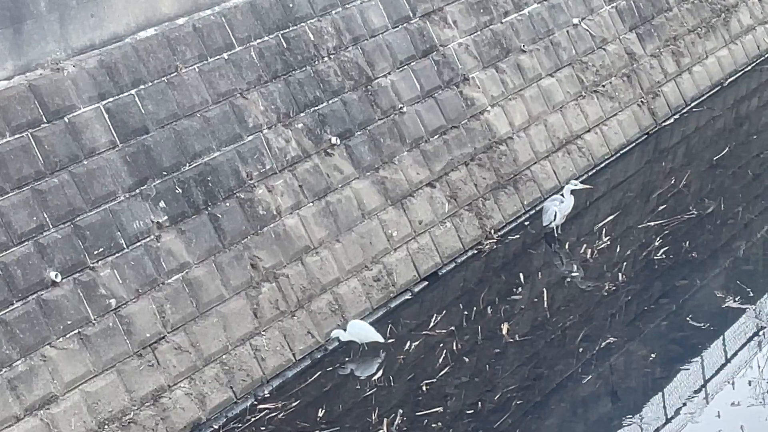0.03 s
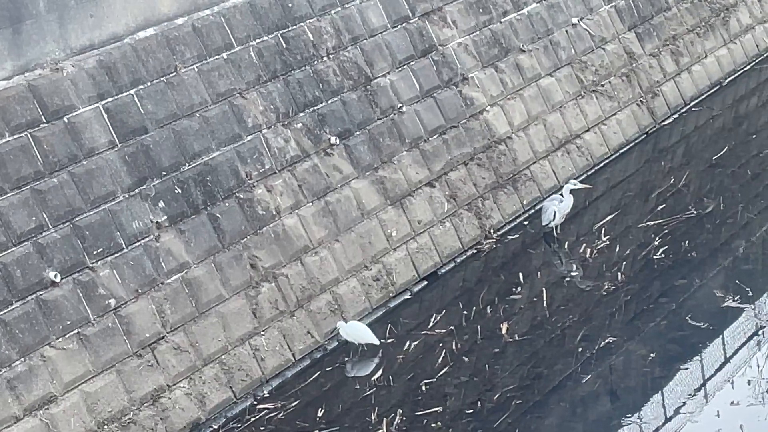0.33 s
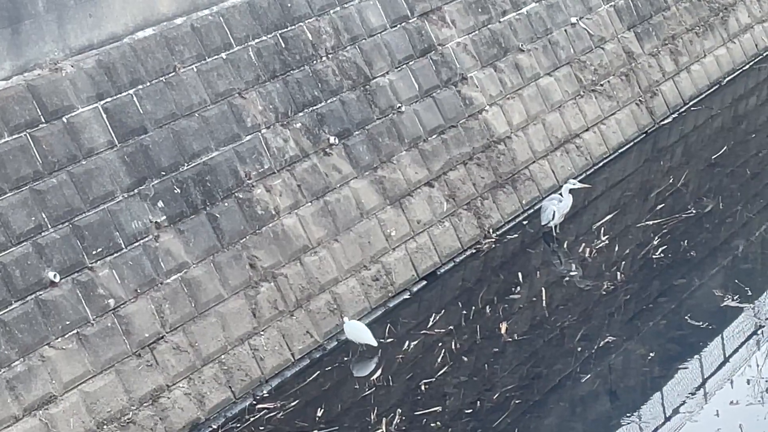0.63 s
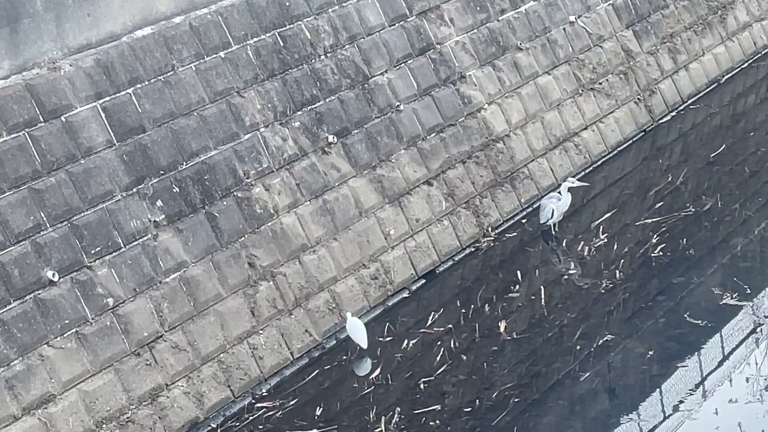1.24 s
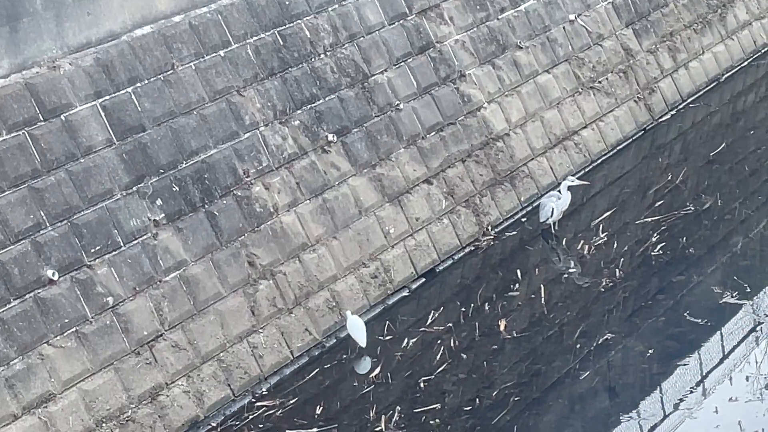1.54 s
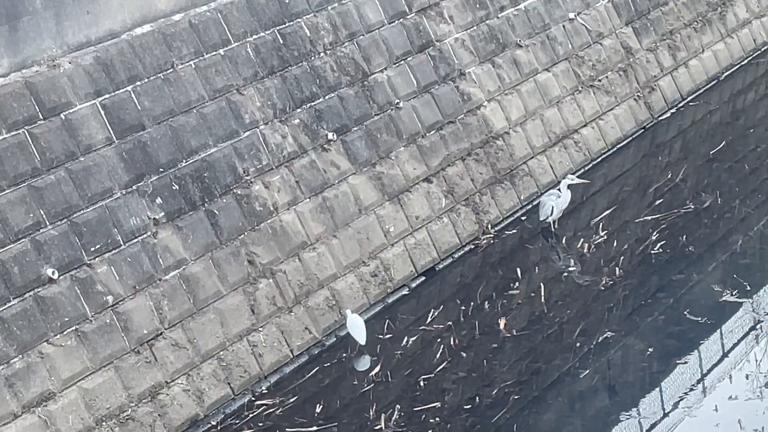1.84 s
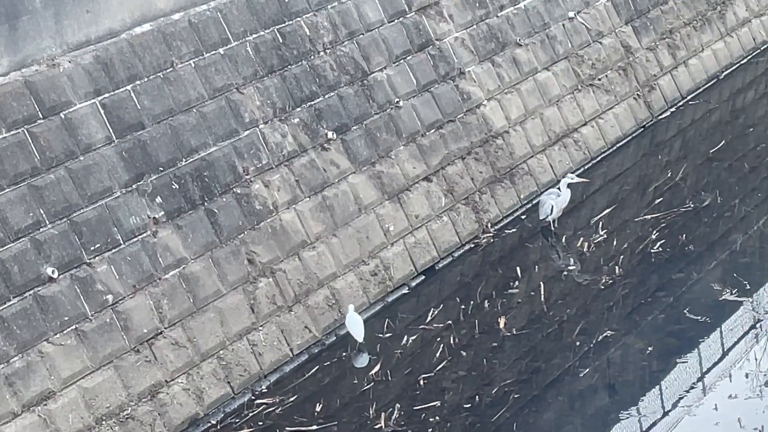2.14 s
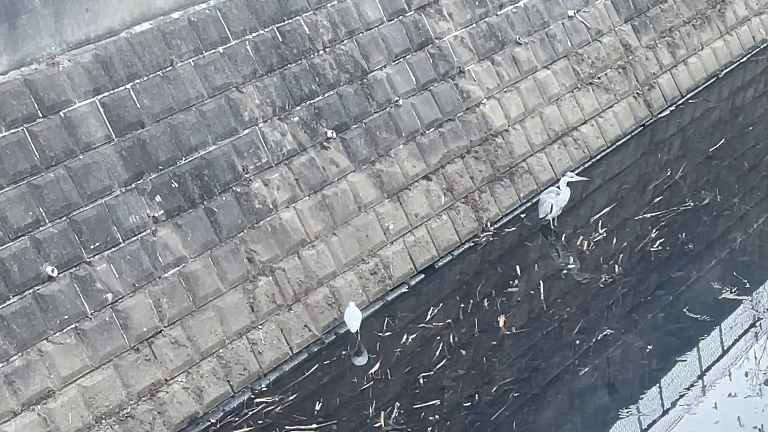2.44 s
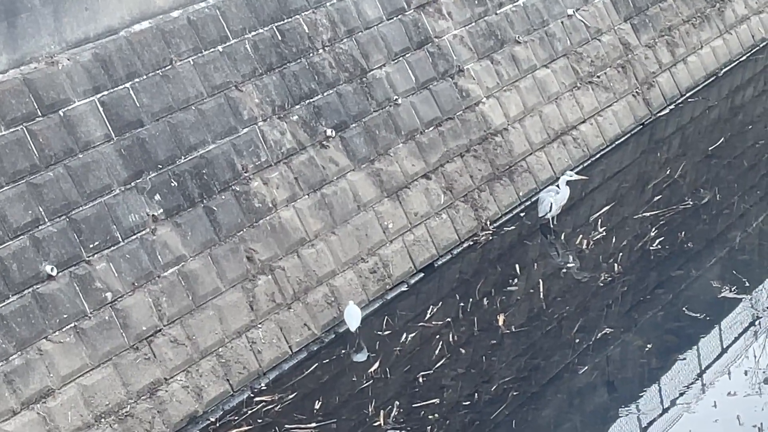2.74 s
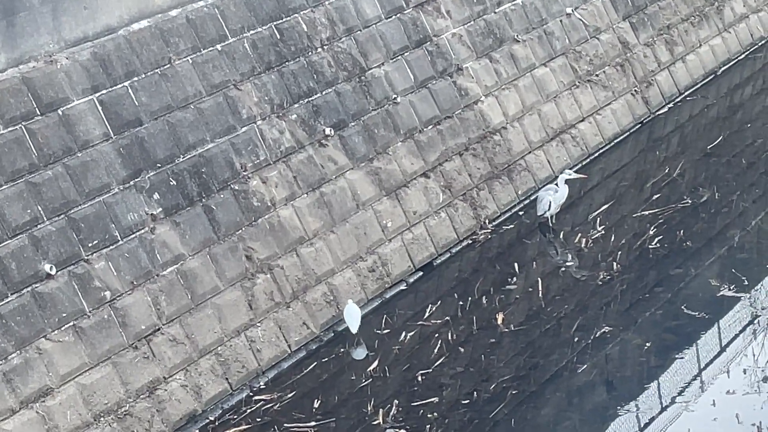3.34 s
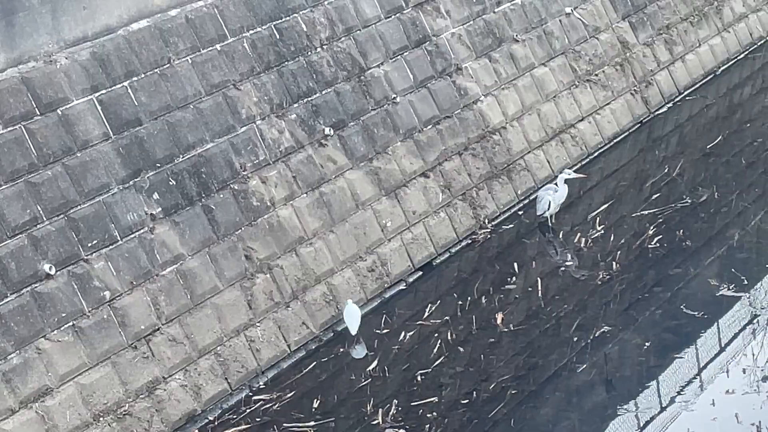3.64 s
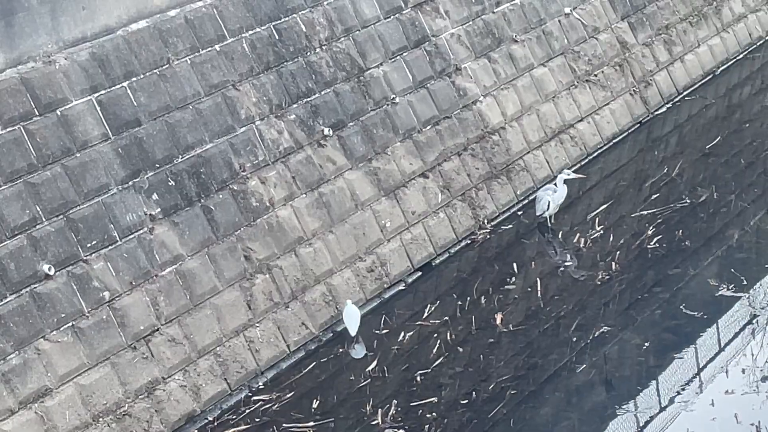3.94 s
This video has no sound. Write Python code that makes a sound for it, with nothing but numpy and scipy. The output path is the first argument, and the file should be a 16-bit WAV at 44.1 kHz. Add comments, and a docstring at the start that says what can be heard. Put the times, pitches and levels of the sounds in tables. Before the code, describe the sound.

Distant traffic rumbles steadily over a faint trickle, then a breeze buffets the microphone.

```python
"""A quiet town canal between stone banks. From the start, distant traffic lays down a dull roar,
an engine drones far off and shallow water trickles faintly; one puff of air touches the microphone.
From about 1 s, soft rustles and small ticks dot the bed. Near 1.9 s a small bird calls once, with a
short tail off the banks, and at 2.5 s something dry brushes close by.
From 2.9 s to the end a breeze buffets the microphone, each eddy a low push."""
import sys
import numpy as np
from scipy import signal
from scipy.fft import rfft, irfft
from scipy.io import wavfile
from scipy.ndimage import uniform_filter1d

SR = 44100
rng = np.random.default_rng(int(sys.argv[2]) if len(sys.argv) > 2 else 0)


def transcribe(signal):
    """Save signal, clipped to [-1, 1], as a 16-bit WAV file at the path in sys.argv[1]."""
    frames = np.atleast_2d(signal).T
    limited = np.clip(frames, -1, 1)
    pcm = np.round(limited * 32767).astype(np.int16)
    wavfile.write(sys.argv[1], SR, pcm)


N = 176400
T = np.arange(N) / SR
HZ = np.fft.rfftfreq(N, 1 / SR)


def traffic():
    """Distant traffic: a wide, dull roar whose bass swells on its own."""
    colour = [(10, -45), (24, -28), (36, -7), (56, 2), (80, -1), (105, -2), (140, -8), (200, -10),
              (255, -11), (330, -13), (480, -19.5), (730, -17), (980, -18), (1200, -22.5), (1520, -22.5),
              (1680, -26.5), (1900, -25.5), (2300, -32.5), (2750, -45), (3500, -60.5), (5000, -79),
              (16000, -108)]  # spectrum of the roar: f/Hz, relative level/dB
    likeness = [(35, 0.59), (75, 0.95), (140, 0.98), (255, 0.65), (380, .62), (620, 0.38), (950, 0.79),
                (1500, .55), (1700, 0.19), (2400, 0.52), (3000, 0.42), (4000, 1)]  # stereo image: f/Hz, left-right likeness
    balance = [(60, -1), (200, -2), (400, -2.5), (600, -0.5), (950, -0.5), (1200, -3.5), (1500, -8.5),
               (1680, 4), (1850, 10.5), (2100, -1), (2350, 0), (3000, -1)]  # left minus right: f/Hz, level/dB
    left_lead = [(340, -0.095), (550, 0.8), (800, 1.56), (1150, 1.5), (1420, 1.37), (1570, 0.083),
                 (1720, 1.4), (1880, .3), (2300, 0.14), (3500, 0.16)]  # the roar arrives from the left: f/Hz, phase lead/rad
    bass_ride = [(0, -3.5), (.6, -3), (1.2, 2), (2.2, -0.5), (2.5, -5), (2.9, -1.5), (4, -1.7)]  # fader below the crossover: t/s, gain/dB
    body_ride = [(0, 0), (1.2, 0.47), (2, 0.43), (2.7, 0), (3.4, -0.1), (4, 1)]  # fader above the crossover: t/s, gain/dB
    roar_db, crossover_hz = -42, 112
    roar = noise(over_hz(colour), over_hz(likeness), over_hz(balance), over_hz(left_lead))
    bass = irfft(rfft(roar) / (1 + (HZ / crossover_hz) ** 4), N)
    body = (roar - bass) * amp(over_time(body_ride) + 0.35 * drift(6.4))
    return amp(roar_db) * (bass * amp(over_time(bass_ride)) + body)


def engines():
    """Far engine drone: wavering low tones that come and go in the traffic."""
    drones = [(0.0, 1.5, 58, 3.5, -50.5), (0.0, 1.5, 252, 2, -61.5), (0.0, 0.22, 129, 2, -52),
              (0.5, 0.32, 105, 1.5, -49.5), (0.9, 0.4, 157, 2, -54), (1.38, 0.75, 108, 2.5, -50.5),
              (1.85, 1.0, 56, 0.9, -48.5), (2.4, 0.24, 201, 3, -54.5)]  # engine tones: start/s, length/s, f/Hz, wander/Hz, level/dB
    fade_s = 0.084
    out = np.zeros(N)
    for start, length, hz, wander, db in drones:
        fade = np.clip(np.minimum(T - start, start + length - T) / fade_s, 0, 1)
        cycles = np.cumsum(hz + wander * drift(5.6)) / SR
        out += amp(db) * fade * unit(np.sin(2 * np.pi * cycles))
    return out


def breeze():
    """Each eddy gives the microphone a short low push; the hardest ones thump higher up."""
    gusts = [(0.302, 0.023, -39), (2.935, 0.038, -44), (3.055, 0.039, -37.5), (3.191, 0.02, -36.5),
             (3.331, 0.037, -38.5), (3.404, 0.018, -28.5), (3.495, 0.022, -33.5), (3.573, 0.018, -39.5),
             (3.638, 0.009, -32), (3.758, 0.04, -40), (3.868, 0.0085, -35)]  # eddies: t/s, half length/s, level before the low cut/dB
    colour = [(10, -50.5), (25, -21), (42, 1), (75, 6), (110, -10.5), (200, -17), (400, -44.5),
              (1000, -58.5), (4000, -100)]  # spectrum of the rumble: f/Hz, relative level/dB
    likeness, low_cut_hz = 0.89, 29
    thump_hz, thump_octaves, thump_db = 174, 0.73, -13
    strength = np.sqrt(sum((amp(db) * swell(s, half)) ** 2 for s, half, db in gusts))
    rumble = steadied(noise(over_hz(colour), likeness), size=1500)
    thump = noise(2 * bell_db(thump_hz, thump_octaves), likeness)
    push = strength * (rumble + amp(thump_db) * strength / strength.max() * thump)
    low_cut = 1 - 1 / (1 + (HZ / low_cut_hz) ** 4)
    return irfft(rfft(push) * low_cut, N)


def bird():
    """One thin call that dips in pitch, with a rasp around each harmonic and no fundamental."""
    contour = [(1.89, 1560, -100, -100, -92.5), (1.908, 1635, -95, -88, -85), (1.922, 1615, -75, -86, -86),
               (1.93, 1588, -66.5, -77, -77), (1.95, 1480, -68, -74.5, -79.5),
               (1.966, 1543, -67, -71.5, -87), (1.975, 1465, -68, -92, -90), (1.989, 1490, -77, -90, -96),
               (2.005, 1560, -86, -100, -100)]  # the call: t/s, pitch/Hz, level/dB of harmonics 2, 3 and 4
    pitch_jitter, flutter_db = 0.011, 0.5
    rasp_db, rasp_hz = -11, 420
    times, pitch, *levels = np.transpose(contour)
    cycles = np.cumsum(np.interp(T, times, pitch) * (1 + pitch_jitter * drift(190))) / SR
    call = np.zeros(N)
    for harmonic, db in enumerate(levels, start=2):
        rasp = amp(rasp_db) * (drift(rasp_hz) + 1j * drift(rasp_hz))
        tone = (1 + rasp) * np.exp(2j * np.pi * harmonic * cycles)
        call += amp(np.interp(T, times, db)) * unit(tone.real)
    gate = (T > times[0]) * (T < times[-1])
    call = call * amp(flutter_db * drift(400)) * gate
    return banks(np.array([call, call]), wet_db=-7.5)


def brushes():
    """A dry snap and scrape close by, in three touches: bright at first, then duller."""
    touches = [(2.534, 0.004, 0.008, -64.5, 5), (2.541, .004, 0.018, -66.5, -2.5),
               (2.585, 0.004, .013, -76, 3)]  # contacts: t/s, rise/s, decay/s, level/dB, tilt/(dB per octave)
    colour = [(1500, -24), (3200, -5), (4200, -3), (5200, 6), (6300, -4), (7400, -5), (8200, 1),
              (9100, -10), (9900, 3), (11000, -11), (13000, -13), (15600, -22)]  # spectrum of the scrape: f/Hz, relative level/dB
    likeness = [(7000, 1), (8200, -1.6), (9500, 0.51), (13000, 0.73), (15000, 0)]  # stereo image: f/Hz, left-right likeness
    grain_db = 1.5
    octaves = np.log2(np.maximum(HZ, colour[0][0]))
    out = np.zeros((2, N))
    for start, rise, decay, db, tilt in touches:
        scrape = steadied(noise(over_hz(colour) + tilt * octaves, over_hz(likeness)), size=130)
        out += amp(db) * burst(start, rise, decay) * scrape * amp(grain_db * drift(400))
    return banks(out, wet_db=-10)


def ticks():
    """Small high ticks and drips, each a burst of noise around its own pitch."""
    hits = [(1.258, 6800, .05, .008, -88), (1.298, 5500, 0.08, 0.01, -83), (1.336, 5370, .06, 0.018, -79),
            (1.44, 4280, 0.022, 0.008, -69.5), (1.562, 4750, .07, .008, -78),
            (2.034, 4600, 0.13, 0.0067, -74), (2.047, 4300, .08, .007, -74), (2.205, 3120, .08, 0.011, -72),
            (2.331, 4350, 0.12, 0.0075, -72.5), (2.875, 6000, .1, 0.0089, -83),
            (3.29, 7000, 0.05, 0.028, -89), (3.475, 6770, 0.085, 0.016, -78),
            (3.475, 11600, .25, 0.0077, -85), (3.518, 6250, 0.076, .02, -86),
            (3.615, 5740, 0.18, 0.0058, -79.5), (3.855, 5400, .2, 0.0092, -85)]  # ticks and drips: t/s, f/Hz, width/octaves, decay/s, level/dB
    rise_s = 0.002
    out = sum(amp(db) * burst(s, rise_s, decay) * band(hz, width) for s, hz, width, decay, db in hits)
    return banks(out, wet_db=-13)


def water():
    """Shallow water: a fine wash with many tiny ringing bubbles; each band gurgles on its own."""
    colour = [(1200, -17), (2500, -2.5), (3000, 3.5), (3600, -1.5), (4300, -2), (5200, -10), (6300, -12),
              (7300, -14.5), (8100, -42), (16000, -48)]  # spectrum of the trickle: f/Hz, relative level/dB
    ride = [(0, -81), (.3, -81.5), (.5, -77.5), (.66, -79.5), (1.05, -79), (1.5, -77.5), (1.68, -80),
            (2.05, -78), (2.45, -79), (2.75, -79), (3.08, -79), (3.35, -79), (3.7, -77), (4, -75)]  # fader of the trickle: t/s, level/dB
    bubbles_per_s, pitches, spread_db, bubbles_db = 900, 20, 4.5, -3
    gurgle_db, gurgle_hz = 1.6, 22
    bubbles = np.zeros(N)
    for hz in np.geomspace(2800, 7000, pitches):
        onsets = rng.random(N) < bubbles_per_s / pitches / SR
        gains = amp(spread_db * np.minimum(rng.exponential(1, N), 4))
        cycles = hz * T[:600]
        ping = cycles * np.exp(-cycles / 5) * np.sin(2 * np.pi * cycles)
        bubbles += signal.oaconvolve(onsets * gains, ping)[:N]
    bubbles = unit(irfft(rfft(bubbles) * amp(over_hz(colour)), N))
    wash_spectrum = rfft(noise(over_hz(colour), 1.0) + amp(bubbles_db) * bubbles)
    centres = np.geomspace(2500, 8000, 10)
    gurgle = np.zeros((2, N))
    for share in np.eye(len(centres)):  # overlapping triangular bands
        wash_band = irfft(wash_spectrum * np.interp(HZ, centres, share), N)
        gurgle += wash_band * amp(gurgle_db * drift(gurgle_hz))
    return amp(over_time(ride)) * unit(gurgle)


def rustles():
    """Soft high noise that swells, flickers and fades."""
    swells = [(0.97, .06, 3700, 0.18, -80), (1.128, 0.074, 3450, 0.18, -78),
              (1.354, 0.035, 5150, 0.14, -88), (1.5, 0.047, 4700, 0.14, -86),
              (2.62, .035, 5400, 0.15, -86.5), (3.078, 0.082, 4300, 0.1, -84)]  # rustles: t/s, half length/s, f/Hz, width/octaves, level/dB
    flicker_db = 2
    out = sum(amp(db) * swell(s, half) * band(hz, width) for s, half, hz, width, db in swells)
    return out * amp(flicker_db * drift(60))


def hiss():
    """A faint, steady hiss under everything."""
    colour = [(2000, 0), (5500, 1.5), (7200, -11.5), (10000, 0), (12000, -2), (13500, -14.5),
              (16000, -21.5)]  # spectrum of the hiss: f/Hz, relative level/dB
    likeness = [(5000, 1), (7000, 0.14), (9000, 0.045), (12000, 0.83)]  # stereo image: f/Hz, left-right likeness
    return amp(-89.5) * noise(over_hz(colour), over_hz(likeness))


def banks(x, wet_db):
    """Adds scattered, slightly dull reflections from the stone banks."""
    t60_s, build_s, dull_hz = 0.35, 0.0052, 9000
    t = T[:SR // 2]
    envelope = amp(-60 * t / t60_s) * np.minimum(t / build_s, 1)
    mid, side = rng.standard_normal((2, len(t))) * envelope
    tail = np.array([mid + .3 * side, mid - .3 * side])
    echoes = signal.fftconvolve(x, tail / np.linalg.norm(tail[0]), axes=1)[:, :N]
    return x + amp(wet_db) * irfft(rfft(echoes) / np.sqrt(1 + (HZ / dull_hz) ** 4), N)


def amp(db):
    """Decibels to gain."""
    return 10 ** (np.asarray(db) / 20)


def unit(x):
    """Scales to rms 1."""
    return x / np.sqrt(np.mean(x ** 2) + 1e-30)


def over_hz(points):
    """Reads a table along log frequency."""
    f, value = np.transpose(points)
    return np.interp(np.log(HZ + 1), np.log(f + 1), value)


def over_time(points):
    """Reads a table along time."""
    return np.interp(T, *np.transpose(points))


def noise(spectrum_db, likeness, pan_db=0, lead=0):
    """Stereo noise of rms 1 with given colour, channel likeness, balance and phase lead of the left."""
    mid, side = rfft(rng.standard_normal((2, N)))
    likeness = np.clip(likeness, -1, 1)  # 1 is mono, -1 is opposite polarity
    mid, side = mid * np.sqrt(1 + likeness), side * np.sqrt(1 - likeness)
    lean = amp(pan_db)
    pair = np.array([(mid + side) * lean * np.exp(1j * lead), mid - side]) / np.sqrt(1 + lean ** 2)
    return unit(irfft(pair * amp(spectrum_db), N))


def bell_db(hz, octaves):
    """A band-pass curve in dB, 6 dB down at the given octaves either side of hz."""
    return -20 * np.log10(1 + (np.log2((HZ + 1) / hz) / octaves) ** 2)


def band(hz, octaves):
    """Even, centred noise around one pitch."""
    return steadied(noise(bell_db(hz, octaves), 1.0), size=400)


def steadied(x, size):
    """Evens out the chance swells of a stereo noise over size samples."""
    return x / np.sqrt(uniform_filter1d((x ** 2).mean(0), size=size) + 1e-6)


def drift(rate_hz):
    """Smooth random motion of rms 1, rolling off above rate_hz."""
    return unit(irfft(rfft(rng.standard_normal(N)) * (HZ > 0) * np.exp(-(HZ / rate_hz) ** 2), N))


def burst(start, rise, decay):
    """A quick rise and an exponential fall."""
    age = T - start
    return np.clip(age / rise, 0, 1) * np.exp(-np.maximum(age - rise, 0) / decay)


def swell(peak_s, half_s):
    """A Gaussian fade in and out."""
    return np.exp(-.5 * ((T - peak_s) / half_s) ** 2)


def scene():
    """Everything heard from above the canal."""
    return traffic() + engines() + breeze() + water() + bird() + brushes() + ticks() + rustles() + hiss()


def record(dry):
    """A steep low-pass takes the very top off the mix."""
    low_pass = signal.firwin(511, cutoff=15700, window=("kaiser", 9), fs=SR)
    return signal.oaconvolve(dry, low_pass[None], "same")


dry = scene()
out = record(dry)
transcribe(out)
```